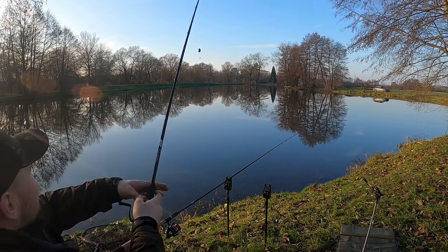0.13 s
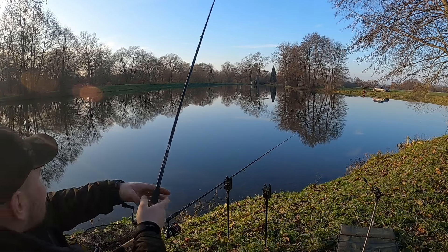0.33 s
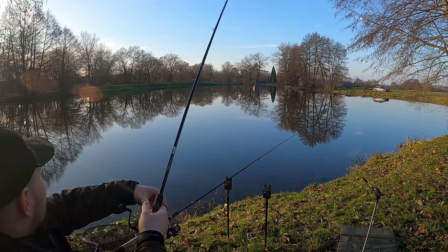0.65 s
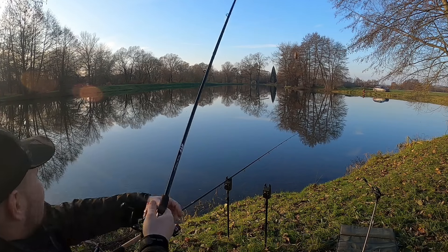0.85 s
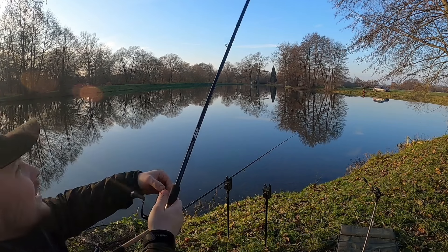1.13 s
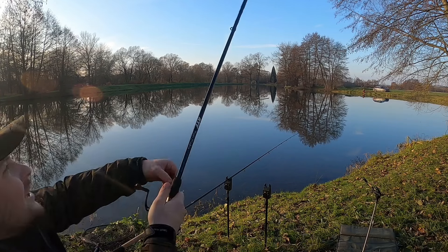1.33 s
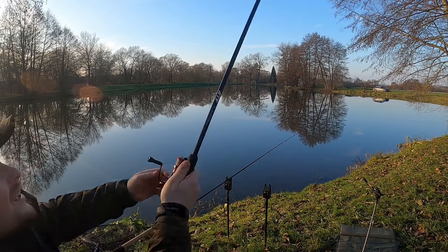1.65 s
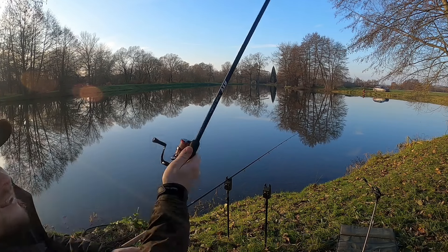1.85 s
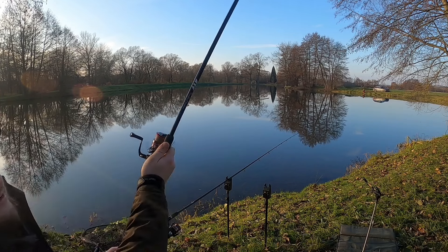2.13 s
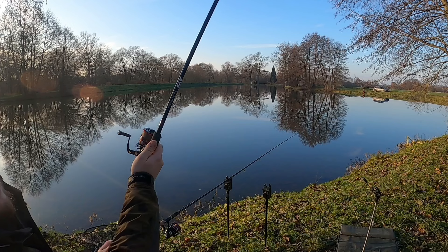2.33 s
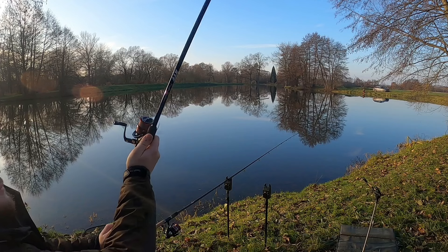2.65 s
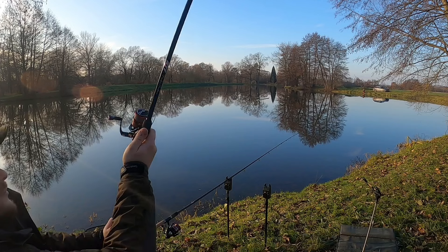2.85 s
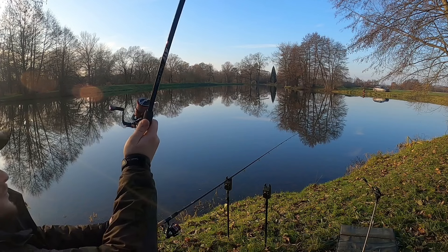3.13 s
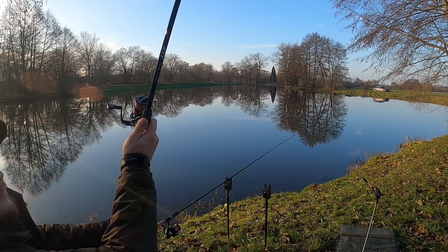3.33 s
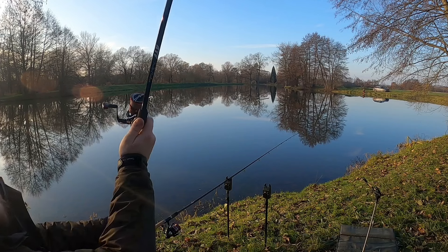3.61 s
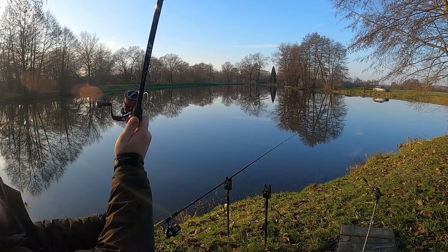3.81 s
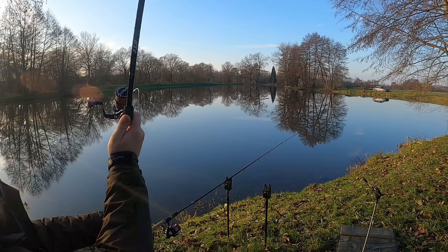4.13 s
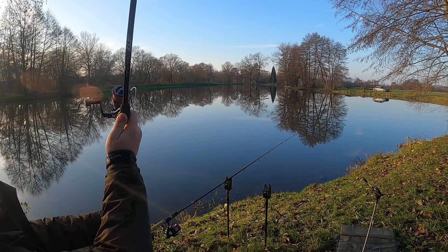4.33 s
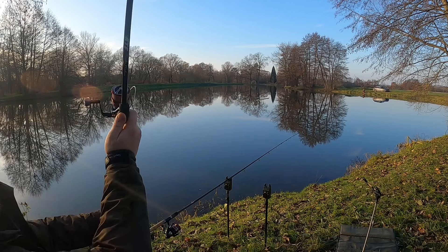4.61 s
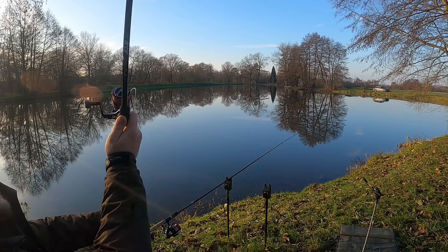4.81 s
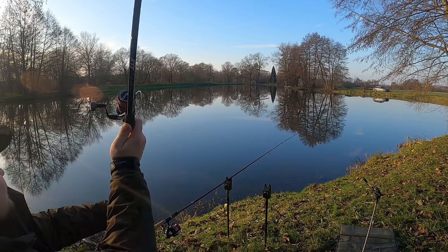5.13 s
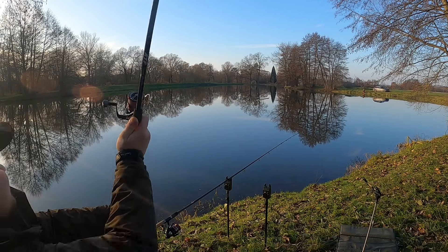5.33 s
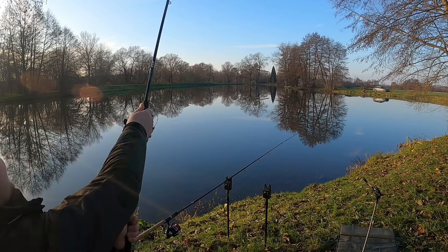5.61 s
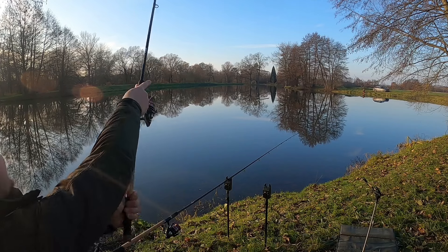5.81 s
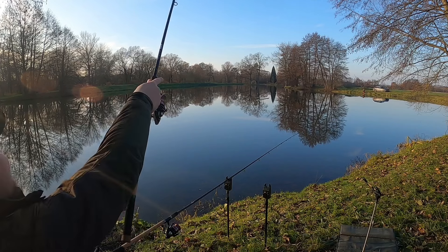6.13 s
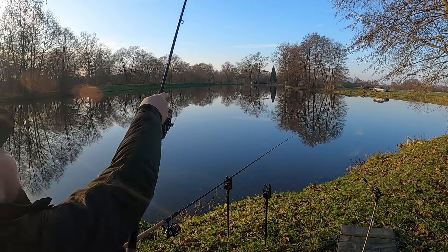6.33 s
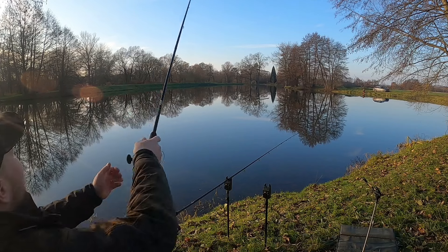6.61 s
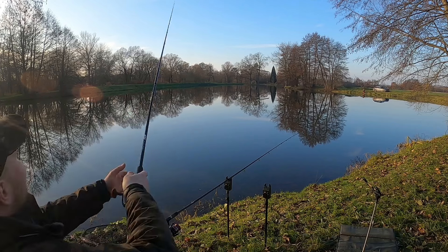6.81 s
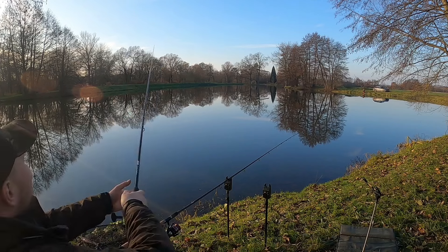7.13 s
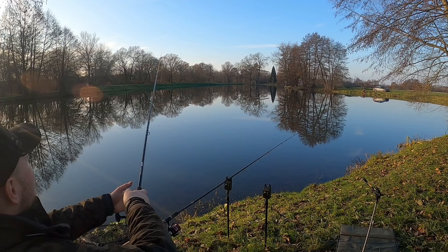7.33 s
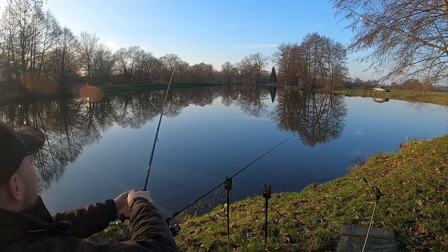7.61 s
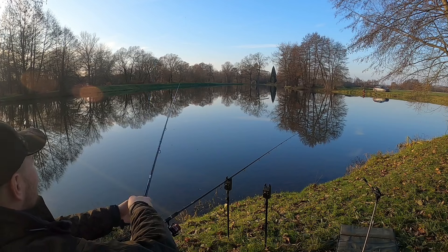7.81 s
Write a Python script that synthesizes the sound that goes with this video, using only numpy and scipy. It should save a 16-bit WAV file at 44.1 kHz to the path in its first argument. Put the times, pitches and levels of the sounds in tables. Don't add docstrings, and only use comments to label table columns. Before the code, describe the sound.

Beside still water, jacket sleeves rustle as a reel clicks, its wire snaps shut and line whirs softly in, with a distant engine droning.

```python
import sys
import numpy as np
from scipy import signal
from scipy.fft import rfft, irfft
from scipy.io import wavfile
from scipy.ndimage import uniform_filter1d

SR = 44100
rng = np.random.default_rng(int(sys.argv[2]) if len(sys.argv) > 2 else 0)


def log_audio(samples):
    frames = np.atleast_2d(samples).T
    limited = np.clip(frames, -1, 1)
    pcm = np.round(limited * 32767).astype(np.int16)
    wavfile.write(sys.argv[1], SR, pcm)


def undo_db(level):
    steps = np.asarray(level, float) / 20
    return 10 ** steps


N = 351036
T = np.arange(N) / SR


def noise():
    return rng.standard_normal(N)


def level(x, db):
    return x * undo_db(db) / np.sqrt(np.mean(x ** 2))


def curves(table):
    s, *columns = np.transpose(table)
    return [np.interp(T, s, column) for column in columns]


def colour(x, spectrum):
    hz, db = np.transpose(spectrum)
    bins = np.arange(1, len(x) // 2 + 2) * SR / len(x)
    gain_db = np.interp(np.log(bins), np.log(hz), db, -120, -120)
    return irfft(rfft(x) * undo_db(gain_db), len(x))


def band(x, hz, width):
    middle = hz * np.sqrt(1 + (width / hz / 2) ** 2)
    edges = np.clip(middle + np.array([-width, width]) / 2, 20, SR / 2.2)
    return signal.sosfilt(signal.butter(2, edges, "band", fs=SR, output="sos"), x)


def walk(rate):
    hold = int(SR / rate)
    steps = np.repeat(rng.standard_normal(N // hold + 1), hold)
    return 0.95 * uniform_filter1d(uniform_filter1d(steps, hold), hold)[:N]


def grains(rate, scatter_db, smear):
    strength = undo_db(scatter_db * np.minimum(rng.exponential(size=N), 3.5))
    hits = (rng.random(N) < rate / SR) * strength
    tail = np.exp(-1 / (smear * SR))
    power = signal.lfilter([1], [1, -tail], hits ** 2)
    return noise() * np.sqrt(power + 1.4)


def add(out, s, sound, db):
    i = int(s * SR)
    out[i:i + len(sound)] += sound * undo_db(db) / np.abs(sound).max()


def fall(t, t60):
    return np.exp(-np.log(1000) * t / max(t60, .001))


def ring(modes, detune, spread_db, crack_db, crack_hz, crack_width, rattle):
    t = T[:4000]
    chance = rng.standard_normal((len(modes), 2))
    body = 0
    for (hz, db, t60), (a, b) in zip(modes, chance):
        tone = np.sin(2 * np.pi * hz * (1 + detune * b) * t)
        body = body + undo_db(db + spread_db * a) * tone * fall(t, t60)
    crack = rng.choice([-1, 1], len(t)) * (fall(t, .004) + rattle * fall(t, .06))
    contact = np.minimum(t / .0003, 1)
    return contact * (body + undo_db(crack_db) * band(crack, crack_hz, crack_width))


def handling():
    # (time [s], peak [dB], start pitch [Hz], end pitch [Hz], t60 [s])
    knocks = [(.1812, -31.5, 1000, 442, 0.016), (0.82, -23, 1900, 600, 0.0053),
              (0.993, -35, 900, 450, 0.015), (1.859, -32.5, 1300, 800, 0.0072),
              (1.8795, -29.5, 950, 700, 0.0063), (1.964, -18, 860, 213, 0.018),
              (1.968, -27, 220, 170, 0.044), (0.183, -24, 240, 174, 0.052)]
    # (time [s], peak [dB], pitch [Hz])
    grip_ticks = [(0.179, -41, 990), (0.183, -36, 1250), (0.829, -38, 1210), (.8495, -36, 1500),
                  (1.9643, -36, 1600), (0.863, -33.5, 840), (1.817, -30.5, 1360), (1.872, -45, 950),
                  (1.835, -37, 900), (5.472, -33, 929), (5.549, -38, 1300), (5.557, -38, 1600),
                  (5.597, -39, 1200), (5.643, -38, 1400), (5.614, -36, 1100), (5.626, -44, 1300),
                  (5.678, -42, 1192), (5.568, -29, 890), (5.572, -36, 890), (5.581, -31, 1090),
                  (5.61, -32, 930), (5.668, -31.5, 1210), (5.836, -39, 900), (5.842, -33.5, 784),
                  (6.554, -36, 800), (6.56, -38, 850), (6.61, -37, 1010), (6.741, -40.5, 1100),
                  (6.835, -41, 1200), (6.702, -36, 1230), (6.604, -41, 800), (6.716, -44, 1300),
                  (6.785, -33.5, 923), (6.872, -36, 1000), (6.888, -36, 861), (6.895, -34, 1080),
                  (6.913, -36, 1073), (6.956, -37, 1030)]
    # (time [s], peak [dB], pitch [Hz], width / pitch [1], t60 [s])
    bright_ticks = [(.110, -37.5, 5460, 0.3, 0.0094), (0.115, -36, 3600, 0.23, .012),
                    (0.357, -49, 5000, 0.7, 0.018), (0.615, -45, 7240, 0.13, .03),
                    (.615, -51, 11100, 0.46, .012), (.720, -44, 7470, 0.074, 0.023),
                    (0.721, -48, 12000, 0.81, 0.011), (0.8197, -34, 3300, 0.8, 0.0091),
                    (0.9913, -29.5, 2430, 0.38, 0.013), (0.991, -37, 4930, 0.44, .004),
                    (1.816, -41, 2430, 0.26, .01), (5.4723, -35.5, 2700, 0.47, 0.0098),
                    (5.472, -37, 5400, 0.37, .008), (5.613, -40, 2600, 0.94, .008),
                    (5.842, -39, 4500, 1.4, .008), (6.957, -38, 2470, 0.79, .012),
                    (6.889, -44, 2000, .6, .01), (6.914, -46, 2000, .6, 0.0089),
                    (5.842, -42, 2300, .7, .01), (5.571, -43, 2500, .7, .01),
                    (6.787, -41, 2600, 0.57, .008), (6.561, -38, 2400, 0.48, 0.0082),
                    (.8405, -48, 10200, 0.18, .012), (7.431, -55, 7400, .07, .02),
                    (7.455, -57, 7250, .07, .02), (7.499, -55, 7300, .07, .03),
                    (7.562, -52, 7350, .06, .025), (7.584, -55, 7300, .07, .02),
                    (7.646, -52, 7350, .07, .035)]
    # (time [s], peak [dB], pitch [Hz], rise [s], t60 [s])
    scrapes = [(0.8382, -52, 6500, .002, .02), (0.8396, -30.5, 2600, 0.0014, 0.014),
               (0.8415, -32.5, 4500, .001, .015), (.8430, -35, 3300, 0.0011, 0.017),
               (0.8495, -36, 2400, 0.0011, 0.013), (.8503, -35, 6200, 0.0012, 0.01),
               (0.8492, -33, 4370, 0.001, 0.02), (0.855, -38, 4500, .001, .012),
               (0.86, -42, 2970, .002, .03), (.8678, -38, 2800, 0.001, 0.011),
               (0.8676, -38, 5600, 0.0011, 0.008), (0.8843, -38.5, 3700, 0.001, 0.018),
               (0.893, -47, 4500, .001, .01)]
    glide_cycles = 1.49
    swell_share, swell_max_s = .09, .0022
    grip_share, grip_t60_s = 0.95, 0.012
    contact_s = 0.0011
    out, t = np.zeros(N), T[:4000]

    for s, db, start_hz, end_hz, t60 in knocks:
        glide_s = glide_cycles / start_hz
        hz = end_hz + (start_hz - end_hz) * np.exp(-t / glide_s)
        swell = 1 - np.exp(-t / min(swell_share * t60, swell_max_s))
        add(out, s, -np.sin(2 * np.pi * np.cumsum(hz) / SR) * fall(t, t60) * swell, db)

    ticks = [(*tick, grip_share, grip_t60_s) for tick in grip_ticks]
    for s, db, hz, share, t60 in [*ticks, *bright_ticks]:
        burst = rng.standard_normal(len(t)) * fall(t, t60)
        burst[0] = -6.5
        add(out, s + contact_s, band(band(burst, hz, hz * share), hz, hz * 2), db)

    for s, db, hz, rise, t60 in scrapes:
        swell = np.minimum((t / rise) ** 2, fall(np.maximum(t - rise, 0), t60))
        burst = rng.standard_normal(len(t)) * swell
        scrape = band(burst, hz, hz * 0.47)
        scrape = scrape + 0.42 * band(burst, 4500, 600)
        scrape = scrape + .04 * band(burst, hz * 3.1, hz * 0.41)
        add(out, s, band(scrape, 3900, 9000), db)
    return out


def reel():
    # (time [s], level [dB], line tightness 0-1 [1], pawl brightness [dB])
    teeth = [(1.3653, -48, .1, 0), (1.3922, -48, .15, 2), (1.4187, -48, .2, 2), (1.4374, -48, .15, 2),
             (1.4505, -49, .1, -2), (1.4601, -49.5, .3, -2), (1.4685, -49.5, .35, -1),
             (1.4762, -49, .6, -1), (1.4844, -49.5, .55, 0), (1.4935, -49, .6, -1),
             (1.5025, -48.5, .65, -1), (1.5125, -48, .85, -5), (1.5239, -48, .9, -7),
             (1.5364, -47.5, .85, -7), (1.5534, -48.5, .75, -6), (1.5733, -47.5, .7, -2)]
    # (frequency [Hz], level [dB], t60 [s])
    spool_modes = [(4300, 5, .014), (4700, 4, .018), (5150, 1, .012), (5900, -1, .01), (7300, -2, .016),
                   (8700, 2, .008), (9700, 3, .01)]
    # (frequency [Hz], level [dB], t60 [s])
    pawl_modes = [(2900, 2, .009), (3500, 1, .009), (11350, -14, .04), (11600, -14, .045),
                  (11850, -14, .04), (12100, -16, .035)]
    # (time [s], peak [dB])
    bail_hits = [
        (5.4268, -31),
        (5.4305, -36),
        (5.4345, -34.5),
        (5.4408, -36),
        (5.447, -41),
    ]
    # (frequency [Hz], level [dB], t60 [s])
    wire_modes = [(775, -6, .04), (1950, 0, .055), (2110, -2, .05), (3100, -5, .04), (3350, -9, .035),
                  (5300, -3, .025), (5850, -6, .035), (6200, -9, .045)]
    tight_pitch, tight_db = .13, 8
    crack_db, top_db, snap_db = 8, 9, 14
    rattle = .09
    out, t = np.zeros(N), T[:4000]
    snap = undo_db(snap_db) * band(1. * (t == t[8]), 6500, 12000)

    for s, db, tight, bright_db in teeth:
        tightened = np.array(spool_modes) * [.93 + tight_pitch * tight, 1, 1]
        tightened = tightened + [0, tight_db * (tight - 1), 0]
        spool = ring(tightened, .02, 1, crack_db, 6000, 8000, rattle)
        pawl = ring(pawl_modes, .004, 1.5, top_db + bright_db, 13300, 4000, rattle)
        i = int((s + .0007) * SR)
        out[i:i + len(t)] += undo_db(db + 3) * (spool + pawl - snap)

    for s, db in bail_hits:
        add(out, s, ring(wire_modes, .012, 1.5, -3, 3500, 5000, .3), db)
    return out


def winding():
    # (time [s], speed as level [dB], roller share [dB], roller pitch [Hz])
    line_speed = [(5.94, -70, 0, 7250), (5.99, -65.5, 7, 7260), (6.46, -68.5, 6, 7290),
                  (6.65, -67.5, 3, 7440), (6.95, -65, -2, 7230), (7.1, -65, -2, 7300),
                  (7.3, -69.5, -7, 7420), (7.45, -67, -2, 7270), (7.58, -68, -2, 7210),
                  (7.7, -68, 0.5, 7300), (7.8, -68, -4, 7300), (7.96, -68, -2, 7300)]
    # (distance above its pitch [Hz], width [Hz], level [dB])
    roller_tones = [(0, 410, 2), (299, 350, -2.5)]
    # (frequency [Hz], level per Hz [dB])
    ring_hiss = [(6500, -30), (8000, -5), (9700, -1), (11200, -7), (12850, -10), (13050, -5), (13250, -11),
                 (14500, -14), (15500, -22), (15900, -40)]
    slack_from_s, slack_db = 7, 4.5
    chatter = grains(560, 1.7, 0.0032)
    speed_db, roller_db, pitch_hz = curves(line_speed)

    roller = 0
    for above_hz, width, db in roller_tones:
        slow = signal.butter(2, width / 2, fs=SR, output="sos")
        sway = signal.sosfilt(slow, [chatter, np.abs(chatter) * noise()])
        turn = 2 * np.pi * np.cumsum(pitch_hz + above_hz + 40 * walk(8.7)) / SR
        roller = roller + level(sway[0], db) * np.cos(turn) + level(sway[1], db) * np.sin(turn)

    hiss = colour(chatter + 0.58 * noise(), ring_hiss) * undo_db(1.1 * walk(24))
    stutter_db = slack_db * np.clip((T - slack_from_s) / 0.29, .2, 1) * walk(22)
    running = np.clip((T - line_speed[0][0]) / .03 + 1, 0, 1)
    line = undo_db(roller_db + stutter_db) * level(roller, 0) + level(hiss, 0)
    return running * undo_db(speed_db) * line


def rod():
    # (peak time [s], half length [s], level [dB], pitch [Hz], width [Hz])
    swings = [
        (5.77, 0.022, -49, 1560, 560),
        (0.361, 0.013, -48, 1600, 750),
    ]
    out = np.zeros(N)
    for s, half, db, hz, width in swings:
        out += level(band(noise(), hz, width), db) * np.exp(-((T - s) / half) ** 2)
    return out


def sleeves():
    # (peak time [s], rise [s], fall [s], level [dB], brightness [dB])
    moves = [(0, 0.064, 0.047, -46, -10), (.12, 0.054, 0.43, -55, -12), (.365, .012, 0.027, -53.5, -6),
             (.68, 0.14, 0.17, -52.5, 7.5), (.85, 0.17, 0.067, -48, -12), (1.08, 0.32, 0.14, -52, -9.5),
             (1.45, 0.25, 0.43, -60.5, 19), (1.97, 0.23, 0.2, -48, -7), (2.15, .1, 0.22, -72, -1),
             (3.51, 0.029, 0.063, -60, 11), (4.93, .06, 0.036, -57.5, -6), (5.45, 0.046, 0.14, -49.5, -10),
             (5.59, 0.095, 0.18, -45, -4), (5.79, 0.071, 0.092, -47.5, -2), (5.83, .025, 0.039, -54, 13),
             (5.95, 0.14, 0.089, -52.5, -13), (6.3, 1, 0.32, -64, 13), (6.6, 0.25, 0.25, -54, -2),
             (6.88, 0.26, 0.066, -56, -4), (7.05, 0.14, .3, -63, 10), (7.5, 0.18, 0.19, -61, 2)]
    # (frequency [Hz], level per Hz [dB])
    fine_spectrum = [(6500, -17.5), (7800, 22), (10000, -9.5), (12500, -10.5), (14500, -16), (15600, -40.5)]
    cloth = grains(1100, 2.6, 0.002)
    rub = level(band(cloth, 990, 2500), 0)
    swish = level(band(band(cloth, 3440, 5000), 4670, 10200), -9.5)
    fine = level(colour(cloth, fine_spectrum), -19.5)

    swells = []
    for s, rise, decay, db, _ in moves:
        shape = np.exp(-2 * np.abs(T - s) / np.where(T < s, rise, decay))
        swells.append(shape * undo_db(2 * db))

    def gain(slope):
        return np.sqrt(sum(power * undo_db(2 * slope * move[-1]) for power, move in zip(swells, moves)))

    return gain(0) * rub + gain(0.72) * swish + gain(0.82) * fine


def crackle():
    # (peak time [s], half length [s], level [dB])
    creases = [
        (5.6, .07, -53),
        (5.68, .03, -55),
        (5.8, .06, -56),
        (6.9, .04, -54),
        (1.86, .05, -62),
        (.856, .02, -50),
    ]

    def snaps():
        return (rng.random(N) < 700 / SR) * rng.standard_normal(N)

    cloth = level(band(snaps(), 1110, 820), 0) + level(band(snaps(), 2630, 1730), 0)
    power = sum(undo_db(2 * db) * np.exp(-2 * ((T - s) / half) ** 2) for s, half, db in creases)
    return cloth * np.sqrt(power)


def engine():
    # (time [s], firing rate [Hz], first line [dB], second line [dB])
    idle = [(0, 53.9, -32, -34.5), (.7, 53.58, -30.5, -35), (1.25, 54.08, -30.5, -34),
            (1.95, 53.17, -31, -36), (2.2, 53.24, -31, -37.5), (2.55, 53.28, -31, -35),
            (3.02, 53.78, -31, -34), (3.55, 52.85, -31, -34.5), (4.25, 52.56, -31, -32.5),
            (5.0, 53.1, -30.5, -34), (5.5, 52.86, -31, -34.5), (6.25, 53.1, -30.5, -35),
            (6.8, 52.96, -30.5, -34), (7.25, 53.17, -29, -33.5), (7.96, 53.05, -31, -33)]
    # (time [s], depth [dB], half width [s])
    sags = [(.24, -9.5, 0.08), (.68, -5, 0.2), (1.10, -6, 0.053), (1.60, -4, 0.086), (1.87, -1.5, 0.024),
            (2.191, -9, 0.084), (2.47, -2.5, 0.071), (3.05, -1.5, 0.13), (3.33, -3, 0.07),
            (3.72, -0.5, 0.15), (4.03, -2, 0.085), (4.5, 0, 0.13), (4.75, -3.5, 0.14), (5.38, -4.5, 0.067),
            (6.079, -2, 0.1), (6.45, -2, 0.084), (6.79, -3.5, 0.075), (7.48, -3, 0.14)]
    # (multiple of firing rate [1], level [dB])
    uneven = [(0.745, -56.5), (1.253, -56), (1.502, -45.5), (1.749, -50.5), (2.248, -54), (2.499, -55),
              (2.999, -67.5)]
    sag_share, hunt_hz = 0.027, 0.15
    hz, first_db, second_db = curves(idle)
    sag_db = sum(db * np.exp(-((T - s) / width) ** 2) for s, db, width in sags)
    turn = 2 * np.pi * np.cumsum(hz + hunt_hz * walk(6)) / SR - 2.2

    out = undo_db(first_db + sag_db + 0.78 * walk(24)) * np.sin(turn)
    second_turn = 2 * turn + .35 + 0.2 * walk(1.5)
    out += undo_db(second_db + sag_share * sag_db + 0.78 * walk(15)) * np.sin(second_turn)
    for k, db in uneven:
        weak_turn = k * turn + 1.27 * walk(5) + 2 * np.pi * rng.random()
        out += undo_db(db + 3.6 * walk(5.4)) * np.sin(weak_turn)
    return np.sqrt(2) * out


def roads():
    # (frequency [Hz], level per Hz [dB])
    hiss_spectrum = [(82, -24.5), (140, -9.5), (176, 0), (238, -3), (267, -10), (305, -6.5), (348, -15.5),
                     (528, -14), (626, -15.5), (950, -24), (1130, -17), (1570, -19), (1780, -18),
                     (2600, -21.5), (5600, -34.5), (7500, -39.5), (13000, -86.5)]
    # (frequency [Hz], level per Hz [dB])
    rumble_spectrum = [(6, -24.5), (14, -13), (22, -6.5), (32, -4.5), (55, -0.5), (100, -3), (150, -6.5),
                       (190, -28.5)]
    hiss = colour(noise(), hiss_spectrum)
    drift = 0.19 * undo_db(1.0 * walk(2.3)) * band(hiss, 1300, 1300)
    flicker = .5 * undo_db(10.3 * walk(45)) * band(hiss, 9400, 4000)
    rumble = colour(noise(), rumble_spectrum)
    return level(hiss + drift + flicker, -47) + level(rumble, -42.5)


def scene():
    angler = handling() + reel() + winding() + rod() + sleeves() + crackle()
    return (angler + engine() + roads())[None]


def low_pass(x):
    return signal.sosfilt(signal.butter(12, 16010, fs=SR, output="sos"), x)


def record(dry):
    top = signal.ellip(10, .3, 70, 15750, fs=SR, output="sos")
    mix = signal.sosfilt(top, dry)
    return low_pass(mix)


dry = scene()
out = record(dry)
log_audio(out)
```